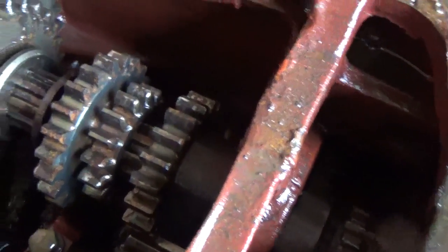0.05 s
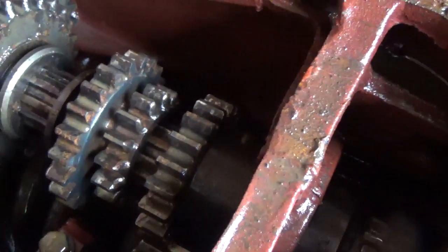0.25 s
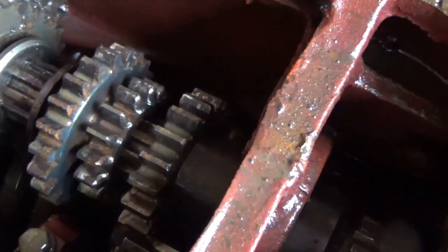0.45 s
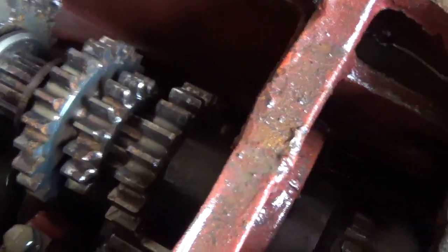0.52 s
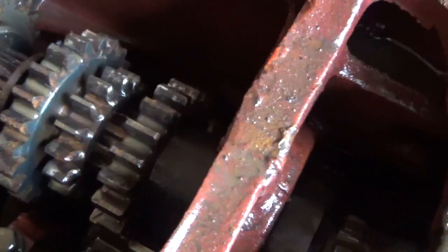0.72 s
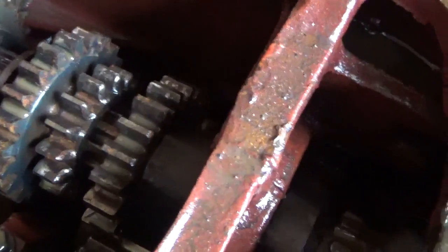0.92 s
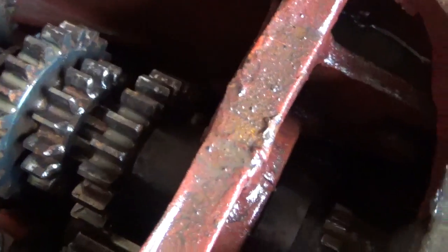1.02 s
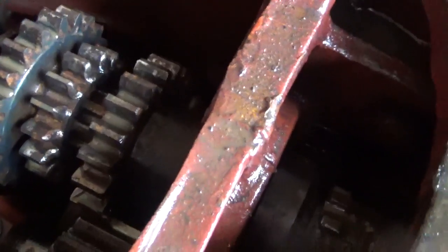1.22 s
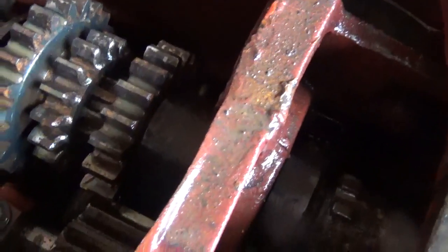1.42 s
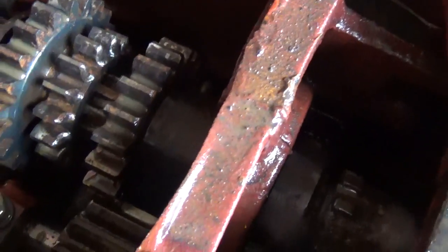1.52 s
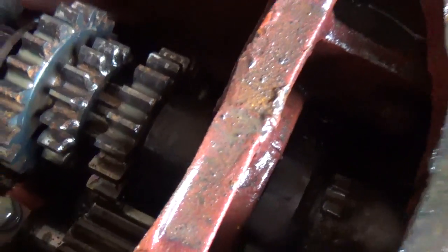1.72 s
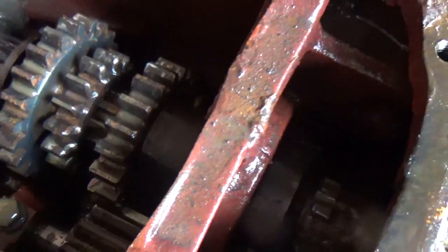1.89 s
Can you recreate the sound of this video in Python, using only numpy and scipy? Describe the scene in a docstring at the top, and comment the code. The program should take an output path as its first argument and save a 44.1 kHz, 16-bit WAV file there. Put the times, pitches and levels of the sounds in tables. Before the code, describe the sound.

Gears spin in a ringing metal casing, teeth knocking and oil crackling as they slow.

```python
"""A low, wavering rumble swells under knocking teeth: oily gears, spun by hand in an open cast gearbox,
speed up and coast to rest. The rolling shaft and the knocks both ring the casing, which sings in surges.
Rough steel grinds, catching teeth clang and their tips chatter. Sticky oil crackles and snaps between
the parting teeth, and dry ticks mark the run-down, all over a low workshop hum."""
import sys
import numpy as np
from scipy import signal
from scipy.fft import rfft, irfft, next_fast_len
from scipy.io import wavfile
from scipy.ndimage import map_coordinates

SR = 44100
rng = np.random.default_rng(int(sys.argv[2]) if len(sys.argv) > 2 else 0)


def wrap_up_sound(samples):
    """Save the sound to the file named by the first command line argument, as 16-bit audio."""
    columns = np.atleast_2d(samples).T
    # keep every value between -1 and 1, then stretch to whole-number steps
    tamed = np.clip(columns, -1, 1)
    steps = np.round(tamed * 32767).astype(np.int16)
    wavfile.write(sys.argv[1], SR, steps)


N = 85995

# Layer envelopes, ahead of the mix gains: time_s, level_db
DRONE_ENV = [(0, -62), (0.058, -43), (0.086, -50), (0.13, -30), (0.184, -43), (0.216, -28), (0.308, -22),
             (0.336, -32), (0.374, -22), (0.422, -32), (0.46, -20), (0.532, -27), (0.602, -22), (0.64, -34),
             (0.672, -17), (0.726, -28), (0.76, -28), (0.786, -20), (0.82, -25), (0.87, -14), (0.9, -26),
             (0.93, -14.5), (1.02, -16), (1.075, -24), (1.11, -18), (1.178, -17), (1.2, -24), (1.286, -17),
             (1.312, -33), (1.345, -27), (1.374, -16), (1.51, -21), (1.526, -26), (1.656, -30),
             (1.685, -40), (1.78, -41), (1.95, -62)]  # how hard the shaft makes the casing sing
BOOM_ENV = [(0, -84), (0.26, -49), (0.32, -26.5), (0.4, -47), (0.5, -29.5), (0.56, -39.5), (0.86, -26.5),
            (0.92, -32), (1.1, -31.5), (1.16, -27), (1.27, -40), (1.33, -34.5), (1.7, -37), (1.95, -70)]  # the casing's deep boom
GRIND_ENV = [(0, -65), (0.17, -45.5), (0.29, -32), (0.35, -34), (0.42, -31.5), (0.48, -24.5), (0.52, -33.5),
             (0.6, -26), (0.68, -31), (0.8, -22.5), (0.87, -22.5), (0.9, -27.5), (0.97, -23), (1.15, -25),
             (1.28, -21), (1.32, -25), (1.46, -27.5), (1.56, -33.5), (1.73, -48), (1.95, -63)]  # midrange grind of steel
OIL_ENV = [(0, -57), (0.1, -52.5), (0.3, -41), (0.7, -38), (0.77, -38), (0.93, -37), (1.0, -38.5),
           (1.3, -36.5), (1.42, -42), (1.6, -45.5), (1.78, -61), (1.95, -58)]  # oil pulled apart between the teeth
# The casing's note, wavering as the load shifts: time_s, pitch_hz
CASING_NOTE = [(0.28, 283.3), (0.46, 297.3), (0.63, 304), (0.68, 277.7), (0.72, 298.8), (0.76, 280.7),
               (0.83, 280.7), (0.865, 302.6), (1.0, 285.8), (1.09, 307.8), (1.28, 299), (1.32, 318.3),
               (1.37, 286.3), (1.64, 294.9), (1.72, 272.5)]
# Resonances of the metal: pitch_hz, width_hz, gain_db
DRONE_MODES = [(264.5, 15, -6), (311.6, 25.3, -2.5), (345, 16.4, -2.5), (222.2, 17.5, -6.5),
               (393, 51, -11.5)]  # singing body of the casing
BOOM_MODES = [(144.6, 9.7, -1.5), (128.8, 13.3, -10.5), (99.5, 4.7, -16.5), (226.8, 20, -9)]  # its low end
GRIND_MODES = [(573.6, 20.4, 1), (619.6, 26.8, 1), (664, 51.4, -1.5), (737, 73, -6.5), (837.5, 19.6, -3.5),
               (930, 46, -11), (1002, 50, -12), (1105.6, 31, -13.5), (1206, 31, -16.5), (1317, 31, -17),
               (1650, 78, -23.5), (1836, 65, -18.5), (2113, 62, -31), (2900, 28, -24.5)]  # its midrange
TIP_MODES = [(4146, 240, 3.5), (5000, 900, -4), (6075, 240, 5)]  # thin ring of the tooth tips
# Single hits: start_s, level_db
TOOTH_KNOCKS = [(0.199, -43), (0.287, -41), (0.368, -24.5), (0.451, -28.5), (0.543, -28.5), (0.585, -31),
                (0.661, -27.5), (0.779, -23), (0.844, -21), (0.953, -21), (1.006, -24), (1.062, -22),
                (1.107, -20.5), (1.143, -24.5), (1.174, -24.5), (1.227, -25), (1.256, -24.5), (1.276, -18),
                (1.362, -22.5), (1.425, -20.5), (1.461, -26), (1.541, -33), (1.592, -35)]  # teeth meeting
GEAR_TICKS = [(0.485, -40), (1.267, -30.5), (1.351, -39), (1.409, -34), (1.432, -38.5), (1.452, -30.5),
              (1.472, -33.5), (1.52, -35.5), (1.593, -41), (1.658, -45)]  # dry ticks of the coasting gears
# Pitched hits: start_s, level_db, pitch_hz, t60_s
TOOTH_CLANGS = [(0.585, -28.5, 922, 0.14), (0.785, -28.5, 2274, 0.089), (0.843, -14.5, 596.6, 0.14),
                (1.008, -22, 1880, 0.074), (1.045, -17.5, 585.4, 0.21), (1.063, -15.5, 837.2, 0.074),
                (1.106, -20.5, 942, 0.13), (1.113, -18, 754, 0.078), (1.142, -17, 827, 0.076),
                (1.173, -17.5, 684, .08), (1.265, -35, 1919, 0.13)]  # teeth that catch
SNAP_HITS = [(0.242, -34, 4500, 0.031), (0.365, -28, 3480, 0.043), (0.544, -32.5, 3930, 0.058),
             (0.615, -29, 5040, 0.015), (0.659, -25.5, 10400, 0.057), (0.661, -31, 4970, 0.062),
             (0.818, -28.5, 5180, 0.037), (0.847, -28.5, 3099, 0.03), (0.905, -26.5, 9350, 0.012),
             (0.9329, -22.5, 4130, 0.06), (0.933, -28, 7884, 0.062), (0.954, -25.5, 4069, 0.067),
             (1.0806, -29, 8600, 0.034), (1.122, -27, 5193, 0.029), (1.142, -21, 3420, 0.024),
             (1.203, -29, 9600, 0.064), (1.292, -34.5, 3160, 0.2), (1.366, -28, 3850, 0.041),
             (1.475, -34.5, 4350, .03), (1.703, -40.5, 4250, 0.026)]  # louder smacks of the oil film, and one brief scrape
# Tone colours of the noise layers: frequency_hz, gain_db
GRIT_EQ = [(60, -26), (130, -22), (250, -9.5), (480, 5), (800, -21.5), (1400, -12.5), (2300, -21.5),
           (4000, -27), (9000, -68)]  # rough steel
CRACKLE_EQ = [(1290, 1), (2200, 3.5), (2400, -4), (2960, 1.5), (5350, -3.5), (6120, -3.5), (7650, -6),
              (10100, -5), (11000, -13), (14300, -77)]  # oil film and bubbles
SQUEEZE_EQ = [(2000, -30), (4000, -10), (6500, 1), (9500, 6), (11000, 1)]  # squeezed oil
WORKSHOP_EQ = [(15, -70), (25, -28), (59, -11.5), (112, -7.5), (145, -7.5), (178, -6), (372, -17),
               (619, -25), (778, -19.5), (1470, -28), (2000, -33), (2330, -41), (6440, -42), (8970, -38),
               (11000, -39.5), (14300, -80)]  # room tone
# Partials of the workshop hum: pitch_hz, level_db
HUM_PARTIALS = [(73, -54.5), (146, -49)]
# Decay of the reflections: frequency_hz, t60_s
ROOM_DECAY = [(150, 0.126), (1500, 0.36), (10000, 0.035)]
# Phase by which the left channel leads the right: frequency_hz, lead_rad
LEFT_LEAD = [(0, 0.91), (430, -0.36), (1380, 0.66), (2670, 0.15), (3360, -0.43), (10900, 0.56)]

NOTE_DB, DRONE_DB, BOOM_DB, KNOCK_DB = -1, -7, -1.5, -3.5
WAVER_HZ, FLUTTERS_PER_S, FLUTTER_DB, OCTAVE_DB, OCTAVE_FLUTTER_DB = 9.23, 90, 2.05, -13, 5.5
CONTACTS_PER_S, CONTACT_SPREAD_DB, LEVELLING_S, PUSH_S = 2200, 3.5, 0.024, 0.0001
GRIND_DB, GRIT_DB, CLACK_DB, SCUFF_DB, SCUFF_RISE_S, GRIND_LOW_CUT_HZ = -2.5, -6, 1, -3, 0.0062, 466
CHATTER_DB, CHATTER_SWING_DB, CHATTERS_PER_S = -12, 5.5, 90
BUBBLES_PER_S, BUBBLE_SPREAD_DB, BUBBLE_DECAY_CYCLES = 1800, 5, 5
CRACKLE_DB, FILM_DB, CLUMP_DB, CLUMPS_PER_S = -7, -5.5, -0.5, 70
SQUEEZE_START_S, SQUEEZE_LENGTH_S, SQUEEZE_DB = 0.36, 0.096, -40.5
TICK_HZ, TICK_T60_S, CLICK_RISE_S = 5960, 0.033, 0.0006
SNAP_WIDTH, TICK_WIDTH = 0.21, 0.07  # bandwidth as a share of the pitch
LOW_SIDE_DB, HIGH_SIDE_DB, LOW_LEFT_DB, HIGH_LEFT_DB = -12, -8.5, 0.6, 2
WHINE_HZ, WHINE_DB, HIGH_CUT_HZ = 9222, -70.5, 11080


def casing_rumble():
    """The casing sings in surges; the rolling shaft and the tooth knocks ring its low modes."""
    drone, boom = amp(curve(DRONE_ENV)), amp(curve(BOOM_ENV))
    singing = drone * (amp(NOTE_DB) * casing_note() + amp(DRONE_DB) * rolling(DRONE_MODES))
    booming = boom * amp(BOOM_DB) * rolling(BOOM_MODES)
    thuds = amp(KNOCK_DB) * tooth_knocks(DRONE_MODES + BOOM_MODES)
    diffuse = drone * rolling(DRONE_MODES) + boom * rolling(BOOM_MODES)
    return stereo(singing + booming + thuds, amp(LOW_SIDE_DB) * diffuse, LOW_LEFT_DB)


def casing_note():
    """The casing's strongest resonance and its rougher octave, wavering in pitch and level."""
    hz = curve(CASING_NOTE) + WAVER_HZ * wobble(FLUTTERS_PER_S)
    phase = 2 * np.pi * np.cumsum(hz) / SR
    octave = unit(amp(OCTAVE_FLUTTER_DB * wobble(FLUTTERS_PER_S)) * np.sin(2 * phase))
    fundamental = unit(amp(FLUTTER_DB * wobble(FLUTTERS_PER_S)) * np.sin(phase))
    return fundamental + amp(OCTAVE_DB) * octave


def rolling(modes):
    """Rolling contact rings a set of modes, levelled to a steady bed at rms 1."""
    ringing = unit(ring(steel_contacts(), modes))
    power = signal.fftconvolve(ringing ** 2, np.hanning(int(2 * LEVELLING_S * SR)), "same")
    return unit(ringing / np.sqrt(np.abs(power) + 0.05 * power.mean()))


def steel_contacts():
    """Tiny random impacts of rough steel on steel."""
    hits = rng.random(N) < CONTACTS_PER_S / SR
    polarity = np.sign(rng.standard_normal(N))
    strength = amp(CONTACT_SPREAD_DB * np.clip(rng.standard_normal(N), -2, 2))
    return unit(hits * polarity * strength)


def tooth_knocks(modes):
    """Each meeting of teeth rings a set of modes at its own level."""
    force = sum(amp(db) * tooth_push(s) for s, db in TOOTH_KNOCKS)
    single_peak = np.abs(ring(tooth_push(0), modes)).max()
    return ring(force, modes) / single_peak


def tooth_push(start_s):
    """The force of one sharp tooth contact."""
    age = since(start_s) / PUSH_S
    return age * np.exp(-age)


def steel_grind():
    """Rough steel rings the higher modes; each tooth clacks, then scuffs as it slides home."""
    power = amp(curve(GRIND_ENV) + GRIND_DB) ** 2
    for s, db in TOOTH_KNOCKS:
        age = since(s) / SCUFF_RISE_S
        power += (amp(db + SCUFF_DB) * age * np.exp(1 - age)) ** 2
    textures = [rolling(GRIND_MODES) + amp(GRIT_DB) * coloured(steel_contacts(), GRIT_EQ)
                for _ in range(2)]
    direct, diffuse = np.sqrt(power) * textures
    clacks = amp(CLACK_DB) * tooth_knocks(GRIND_MODES)
    pair = stereo(direct + clacks, amp(HIGH_SIDE_DB) * diffuse, HIGH_LEFT_DB)
    return filtered(pair, lambda hz: hz ** 2 / np.hypot(hz ** 2, GRIND_LOW_CUT_HZ ** 2))


def tooth_clangs():
    """A catching tooth rings briefly at one unsteady pitch."""
    clangs = np.zeros(N)
    for s, db, hz, t60 in TOOTH_CLANGS:
        t = since(s)
        envelope = amp(db - 60 * t / t60) * (1 - np.exp(-t / 0.012))
        clangs += envelope * np.sin(2 * np.pi * hz * t + 0.58 * wobble(130))
    return stereo(amp(6) * clangs, 0, HIGH_LEFT_DB)


def oil_crackle():
    """Tiny bubbles burst over the oil film's soft hiss, with one bright squeeze early on."""
    t = np.arange(SR // 100) / SR
    when, pitch, size = rng.random((4000, 3))[:int(BUBBLES_PER_S * N / SR)].T[:, :, None]
    cycles = (2500 + 8000 * pitch) * t
    strength = amp(-BUBBLE_SPREAD_DB * np.log(size + 1 / 20))
    pops = strength * np.sin(2 * np.pi * cycles) * np.exp(-cycles / BUBBLE_DECAY_CYCLES)
    positions = (when * N).astype(int) + np.arange(len(t))
    bursts = np.bincount(positions.ravel(), pops.ravel(), N)[:N]
    film = amp(FILM_DB + 4.25 * wobble(39.53)) * coloured(rng.standard_normal(N), CRACKLE_EQ)
    progress = np.minimum(since(SQUEEZE_START_S) / SQUEEZE_LENGTH_S, 1)
    swell = np.sqrt(np.abs(np.sin(np.pi * progress)))
    squeeze = amp(SQUEEZE_DB) * swell * coloured(rng.standard_normal(N), SQUEEZE_EQ)
    crackle = amp(CRACKLE_DB) * coloured(bursts * amp(CLUMP_DB * wobble(CLUMPS_PER_S)), CRACKLE_EQ)
    oil = amp(curve(OIL_ENV)) * (film + crackle) + squeeze
    return placed(oil, left_db=2.5, wet_db=-6.5, side_db=-6)


def clicks(hits, width):
    """Snaps, ticks or a scrape: short bursts of pitched noise that scatter inside the casing."""
    track, t = np.zeros(N + SR), np.arange(SR // 8) / SR
    for s, db, hz, t60 in hits:
        envelope = amp(-60 * t / t60) * (1 - np.exp(-t / CLICK_RISE_S))
        b, a = signal.iirpeak(hz, 1 / width, SR)
        burst = signal.lfilter(b, a, rng.standard_normal(len(t)) * envelope)
        band_rms = np.sqrt(np.pi * hz * width / SR)
        track[round(s * SR):][:len(t)] += amp(db) * burst / band_rms
    return placed(track[:N], left_db=0.5, wet_db=-10, side_db=-11)


def tip_chatter():
    """The tooth tips rattle in quick flurries, swelling and fading with the oil."""
    flurries = steel_contacts() * amp(CHATTER_SWING_DB * wobble(CHATTERS_PER_S))
    tips = unit(ring(flurries, TIP_MODES))
    return stereo(amp(curve(OIL_ENV) + CHATTER_DB) * tips, 0, HIGH_LEFT_DB)


def workshop():
    """Steady room tone, a wavering low hum and a faint high whine."""
    t = since(0)
    mid, side = coloured(rng.standard_normal((2, N)), WORKSHOP_EQ)
    hum = sum(amp(db) * np.sin(2 * np.pi * hz * t + 1.4 * wobble(12.46)) for hz, db in HUM_PARTIALS)
    whine = amp(WHINE_DB) * np.sin(2 * np.pi * WHINE_HZ * t + wobble(27))
    return stereo(amp(-45) * mid, amp(-64) * side, left_db=0) + np.sqrt(2) * (hum + whine)


def placed(x, left_db, wet_db, side_db):
    """Pan a source and add reflections, some shared by both ears and some spread wide."""
    hz, t, noise = signal.stft(rng.standard_normal((2, SR // 3)), SR, nperseg=256)
    decay = amp(-60 * t / along(ROOM_DECAY, hz)[:, None])
    tail = signal.istft(noise * decay, SR, nperseg=256)[1]
    common, side = signal.fftconvolve(x[None], tail, axes=1)[:, :N]
    return stereo(x + amp(wet_db) * x.std() * unit(common), amp(side_db) * x.std() * unit(side), left_db)


def stereo(mid, side, left_db):
    """Mid and side to left and right, leaning left by left_db."""
    return np.array([amp(left_db / 2) * (mid + side), amp(-left_db / 2) * (mid - side)])


def ring(x, modes):
    """x through a bank of resonators of alternating polarity."""
    return filtered(x, lambda f: sum(
        (-1) ** k * amp(db) * 1j * f * width / (hz * hz - f * f + 1j * f * width)
        for k, (hz, width, db) in enumerate(modes)))


def coloured(x, eq):
    """x through an EQ curve, at rms 1."""
    return unit(filtered(x, lambda hz: amp(along(eq, hz))))


def filtered(x, response):
    """x through a complex frequency response."""
    size = next_fast_len(N + SR // 2)
    return irfft(rfft(x, size) * response(np.fft.rfftfreq(size, 1 / SR)), size)[..., :N]


def along(points, hz):
    """Read (frequency_hz, value) points on a log axis."""
    knots_hz, values = np.transpose(points)
    return np.interp(np.log(hz + 1), np.log(knots_hz + 1), values)


def curve(points):
    """Join (time_s, value) points into one value per sample."""
    return np.interp(np.arange(N) / SR, *np.transpose(points))


def wobble(rate):
    """A smooth random curve, rate knots a second."""
    return map_coordinates(rng.standard_normal(400), [np.arange(N) * rate / SR], mode="mirror")


def since(start_s):
    """Seconds after a cue, zero before it."""
    return np.maximum(np.arange(N) / SR - start_s, 0)


def amp(db):
    """Decibels to gain."""
    return 10 ** (np.asarray(db) / 20)


def unit(x):
    """Scaled to rms 1."""
    return x / np.sqrt(np.mean(x ** 2) + 1e-20)


def scene():
    """The mix: ringing metal in front, oil and ticks on top, the workshop behind."""
    metal = casing_rumble() + steel_grind() + tooth_clangs() + tip_chatter()
    crackle = oil_crackle() + clicks(SNAP_HITS, SNAP_WIDTH)
    ticks = clicks([(s, db, TICK_HZ, TICK_T60_S) for s, db in GEAR_TICKS], TICK_WIDTH)
    return metal + crackle + ticks + workshop()


def record(dry):
    """Two spaced microphones hear the gears out of phase; a hard high cut takes off the top."""
    share = np.array([[0.5], [-0.5]])
    return filtered(dry, lambda hz: (hz < HIGH_CUT_HZ) * np.exp(1j * share * along(LEFT_LEAD, hz)))


dry = scene()
out = record(dry)
wrap_up_sound(out)
```